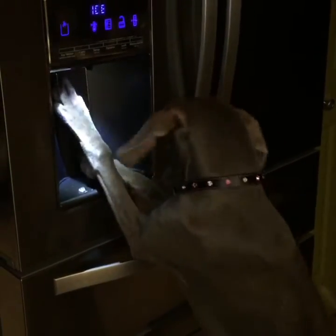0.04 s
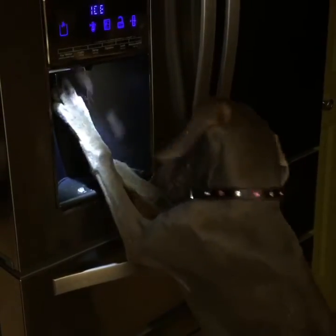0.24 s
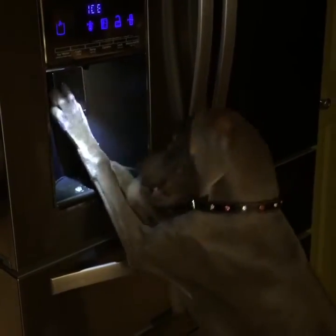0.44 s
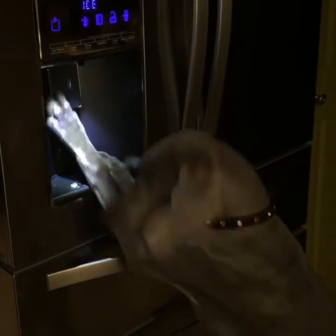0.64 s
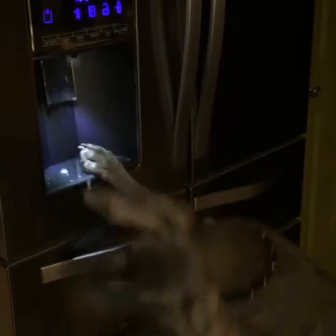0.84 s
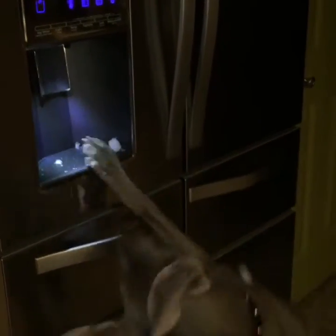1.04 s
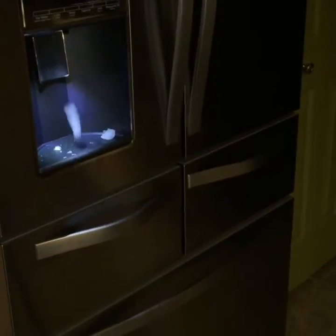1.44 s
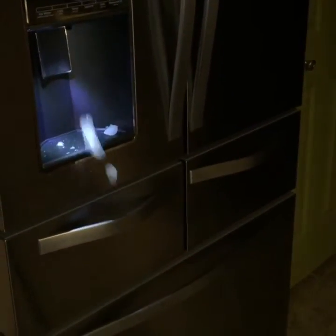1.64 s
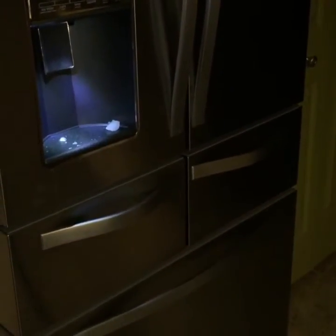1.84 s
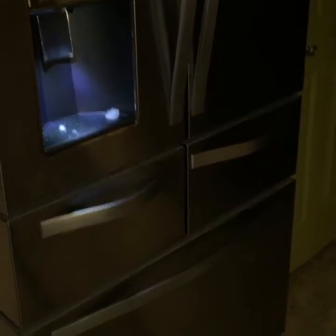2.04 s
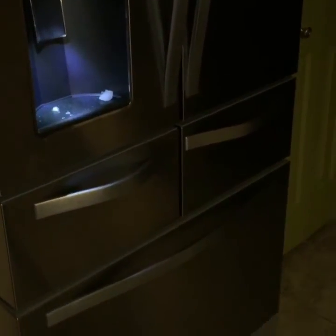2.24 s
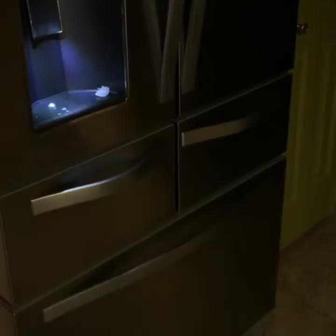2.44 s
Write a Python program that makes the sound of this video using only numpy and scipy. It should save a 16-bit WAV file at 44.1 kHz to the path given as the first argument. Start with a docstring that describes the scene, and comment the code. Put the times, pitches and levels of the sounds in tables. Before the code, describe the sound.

A refrigerator ice dispenser hums and whirs as ice clatters down its plastic chute, with dull bumps and faint dog tag jingles. The motor stops, and one piece clicks across the hard floor of a quiet kitchen.

```python
"""A dog leans on the paddle of a refrigerator's ice dispenser, and the auger motor hums and whirs.
The auger churns the ice, and falling pieces excite the resonances of the plastic chute and tray,
among bumps of the door and the first jingles of the dog's metal collar tags. Near 1.6 s the dog drops
away and the motor runs down. Last, one piece bounces with sharp clicks on the hard floor, while the
tags ring on and the dog moves off with a faint rubbing in the quiet, reverberant kitchen."""
import sys
import numpy as np
from scipy import signal
from scipy.fft import rfft, irfft, next_fast_len
from scipy.io import wavfile
from scipy.ndimage import map_coordinates

SR = 44100
rng = np.random.default_rng(int(sys.argv[2]) if len(sys.argv) > 2 else 0)


def output_pcm(signal):
    """Save a mono or channel-first signal as 16-bit PCM at the path in sys.argv[1].

    Samples are clipped to [-1, 1] before scaling.
    """
    pcm = np.clip(np.atleast_2d(signal).T, -1, 1) * 32767
    wavfile.write(sys.argv[1], SR, np.round(pcm).astype(np.int16))


N = 114660

# ice striking chute and tray (time [s], knock [dB], crack [dB], contact decay [s], ring of piece [Hz])
ICE_IMPACTS = [(.092, -41, -50.5, 0.0026, 3580), (0.202, -35.5, -51, 0.0085, 2150),
               (0.223, -29, -41, 0.013, 2080), (0.284, -28.5, -36, 0.0049, 2100),
               (.292, -26, -23.5, 0.0089, 2050), (0.349, -22.5, -21.5, 0.0093, 2080),
               (.394, -28, -17, 0.002, 3070), (0.4008, -55, -29, 0.0017, 3350),
               (0.4073, -49, -23.5, 0.0026, 3120), (.414, -30.5, -19, 0.016, 2670),
               (.498, -29, -36.5, 0.0069, 935), (0.547, -47, -35.5, 0.0056, 2980),
               (.625, -28, -36.5, 0.011, 1350), (0.7937, -23.5, -31, 0.0036, 1140),
               (0.7972, -20.5, -23.5, 0.0045, 1690), (0.877, -48, -39, 0.00038, 3000),
               (0.9242, -47, -29, 0.00074, 3000), (0.954, -24.5, -22.5, 0.0088, 2150),
               (1.009, -47, -25, 0.0073, 2170), (1.1244, -14, -22, 0.0023, 1900),
               (1.2565, -33.5, -38, 0.0042, 2670), (1.288, -24.5, -29.5, 0.0077, 1560),
               (1.3, -24.5, -31.5, 0.0022, 3240), (1.4221, -30, -19, 0.0055, 4100),
               (1.435, -33, -24.5, 0.0018, 4050), (1.4507, -51, -28, 0.0026, 4000),
               (1.5037, -25, -33.5, 0.0062, 2900), (1.54, -33, -36, 0.0022, 1250),
               (1.616, -17.5, -21.5, 0.0081, 1310), (1.638, -23, -24, 0.009, 3200),
               (1.646, -23.5, -22.5, 0.01, 2930)]
# modes of the plastic chute (frequency [Hz], gain [dB])
CHUTE_MODES = [(230, -2), (630, 4.5), (1130, 6.5), (1230, 5.5), (1440, 6.5), (1575, 2.5), (1890, 0.5),
               (2100, 6.5), (2400, 1.5), (2745, 2.5), (3250, 3), (3800, -0.5)]
# spectrum of cracking ice (frequency [Hz], gain [dB])
CRACK_SPECTRUM = [(100, -12), (800, -3), (2000, -4), (3300, 2.5), (4800, -1.5), (6200, 2.5), (9000, -2),
                  (12000, -5.5), (16000, -2.5)]
# envelope of the ice tumbling in the bin (time [s], level [dB])
CHURN_LEVEL = [(0, -51), (.17, -73), (.3, -44), (.45, -42.5), (.62, -35), (.77, -42.5), (.93, -34),
               (1.05, -36), (1.25, -41.5), (1.5, -37), (1.68, -36.5), (1.8, -46.5), (1.95, -66.5)]
# spectrum of the tumbling ice (frequency [Hz], gain [dB])
CHURN_SPECTRUM = [(200, -55.5), (700, -14.5), (1400, -6), (3000, -12), (4700, -15.5), (7000, -12.5),
                  (11000, -15.5), (16000, -13.5)]
# envelope of the auger motor (time [s], level [dB])
MOTOR_LEVEL = [(0, -33), (.2, -32), (.35, -30.5), (.55, -33.5), (.7, -31), (1.1, -32), (1.25, -35.5),
               (1.4, -38.5), (1.55, -41), (1.7, -61), (1.85, -76)]
# partials of motor and gears (frequency [Hz], level relative to the motor envelope [dB])
HUM_PARTIALS = [(183, -22), (365, -11.5), (640.6, -18)]
# spectrum of the gearbox whir (frequency [Hz], gain [dB])
WHIR_SPECTRUM = [(30, -38), (70, -31), (130, -16.5), (230, -1.5), (310, -3), (450, -5.5), (650, 1.5),
                 (1000, -3.5), (2000, -11.5), (3300, -15.5), (5000, -21), (10000, -38.5), (16000, -42)]
# ice landing on the floor (time [s], click level [dB], clack relative to the click [dB])
FLOOR_IMPACTS = [(1.814, -53, 1), (2.0862, -30, 2.5), (2.092, -23, -4.5), (2.1323, -30.5, -1.5),
                 (2.186, -40, -4), (2.325, -22, -12.5), (2.375, -38.5, -2.5), (2.482, -46.5, -22)]
# spectrum of a floor click, with a thin high sheen added near 15 kHz (frequency [Hz], gain [dB])
CLICK_SPECTRUM = [(100, -23), (600, -3), (2000, -22.5), (3500, 7), (6500, 8.5), (10000, 1), (13000, -3.5),
                  (15200, 4.5)]
# modes of the floor and the landing piece (frequency [Hz], bandwidth [Hz], gain [dB])
CLACK_MODES = [(950, 190, 5), (1680, 750, 5), (3150, 1860, 6)]
# dull bumps on the door (time [s], level [dB], frequency [Hz], contact decay [s])
DOOR_BUMPS = [(0.595, -28.5, 232, 0.03), (0.665, -43, 205, 0.0065), (0.693, -25.5, 263, .008),
              (.72, -27.5, 258, 0.026), (.791, -31.5, 275, 0.009), (.868, -22, 239, 0.014),
              (1.087, -40, 153, 0.01), (1.126, -24.5, 240, 0.0057), (1.32, -40, 81, 0.015),
              (1.558, -41, 139, 0.02), (2.087, -38, 218, 0.011), (2.325, -48, 293, 0.0062)]
# hollow knocks of paddle, tray and collar (time [s], level [dB], pitch [Hz])
HOLLOW_KNOCKS = [(.378, -29, 1420), (.587, -26.5, 850), (.874, -24, 710), (.909, -51, 792),
                 (1.3656, -34, 1400), (1.581, -23, 746), (1.885, -46, 1310), (2.046, -49.5, 740)]
# modes of those knocks (ratio to the pitch [1], bandwidth [Hz], gain [dB])
HOLLOW_MODES = [(1, 227, 3.5), (1.66, 200, -1), (2.1, 196, -5)]
# collar tags touching (time [s], lower mode's relative level [dB], upper mode's relative level [dB])
TAG_CONTACTS = [(0.546, -38, -36), (0.675, -43, -36.5), (0.983, -42, -29), (1.029, -34.5, -29.5),
                (1.368, -38, -32.5), (1.541, -34, -33), (1.651, -26.5, -28), (1.699, -36, -39),
                (1.828, -35.5, -53), (1.882, -33, -25.5), (2.044, -37.5, -30), (2.196, -52, -45),
                (2.262, -43.5, -47), (2.416, -46, -45), (2.437, -40.5, -43), (2.554, -40, -52),
                (2.574, -39.5, -40)]
# lower and upper mode of the tags (frequency [Hz])
TAG_MODES = [9730, 11085]
# envelope of the rubbing (time [s], level [dB])
RUB_LEVEL = [(2.05, -78.5), (2.25, -53.5), (2.42, -52), (2.6, -56.5)]
# spectrum of the still kitchen air (frequency [Hz], gain [dB])
AIR_SPECTRUM = [(25, -6), (110, -3.5), (200, -0.5), (450, -21), (1700, -15), (5000, -22), (15000, -44)]
# reverberation of the kitchen (frequency [Hz], time to fall by 60 dB [s])
ROOM_T60 = [(200, 0.97), (1400, 0.58), (4000, 0.5448), (8000, 0.41), (15000, 0.95)]
# spectrum of the reflections (frequency [Hz], gain [dB])
ROOM_SPECTRUM = [(200, 1), (1500, 0), (7000, -2.5), (11000, -6), (15000, -9)]


def clatter():
    """Impact excitation: each piece cracks brightly and drives its own mode and those of the chute."""
    out = np.zeros(N)
    chute_modes = [(hz, 0.071 * hz, db) for hz, db in CHUTE_MODES]
    for s, knock_db, crack_db, decay, hz in ICE_IMPACTS:
        piece = blow(damped_mode(flat_contact(decay), hz, relative_width=0.38))
        wall = blow(resonate(flat_contact(decay), chute_modes))
        knock = blow(wall + amp(1.5) * piece)
        crack = blow(coloured(contact(decay), CRACK_SPECTRUM))
        add(out, s, kitchen(amp(knock_db) * knock + amp(crack_db) * crack, room_db=-12.5))
    return out


def churn(contacts_per_s=400):
    """A Poisson process: many small, independent contacts of ice in the bin merge into a crunch."""
    impulses = (rng.random(N) < contacts_per_s / SR) * rng.choice([-1, 1], N)
    strength = amp(np.clip(rng.standard_normal(N), -2, 2))
    crunch = coloured(impulses * strength, CHURN_SPECTRUM)
    return level(CHURN_LEVEL) * unit(kitchen(crunch, room_db=2))


def motor(pitch_waver=0.0129, flutter_db=2.5, sag_db=-11, sag_s=0.24, sag_half_span_s=0.057):
    """Frequency and amplitude modulation roughen the motor's hum, over the noisy whir of the gears."""
    hum = 0
    for hz, db in HUM_PARTIALS:
        phase = 2 * np.pi * np.cumsum(hz * (1 + pitch_waver * wobble(22.66))) / SR
        roughness = 1 + .4 * wobble(70)
        hum += amp(db + flutter_db * wobble(12.52)) * roughness * np.sqrt(2) * np.sin(phase)
    # the hum weakens as the auger takes up the ice
    sag = amp(sag_db * np.exp(-((np.arange(N) / SR - sag_s) / sag_half_span_s) ** 4))
    whir = unit(coloured(rng.standard_normal(N), WHIR_SPECTRUM) * amp(1.7 * wobble(59.24)))
    return level(MOTOR_LEVEL) * (sag * hum + amp(-2.5) * whir)


def floor_bounces():
    """A brief impact has a broad spectrum: ice clicks on the floor; a flat landing adds a dull clack."""
    out = np.zeros(N)
    for s, db, clack_db in FLOOR_IMPACTS:
        chips = flat_contact(decay=0.00107)  # crumbs break off at each landing
        force = blow(signal.unit_impulse(len(chips))) + blow(chips)
        click = blow(coloured(force, CLICK_SPECTRUM))
        clack = blow(resonate(chips, CLACK_MODES))
        add(out, s, kitchen(amp(db) * (click + amp(clack_db) * clack), room_db=-6))
    return out


def bumps_and_knocks():
    """Damped resonance: the door panel thuds in one low mode; paddle, tray and collar knock in three."""
    out = np.zeros(N)
    for s, db, hz, decay in DOOR_BUMPS:
        thud = damped_mode(flat_contact(decay), hz, relative_width=0.33)
        add(out, s, amp(db) * blow(kitchen(thud, room_db=-9.5)))
    for s, db, hz in HOLLOW_KNOCKS:
        modes = [(hz * ratio, width, mode_db) for ratio, width, mode_db in HOLLOW_MODES]
        knock = resonate(flat_contact(decay=.012), modes)
        add(out, s, amp(db) * blow(kitchen(knock, room_db=-17.5)))
    return out


def collar_tags(t60_s=0.16, attack_s=0.0068, linewidth_hz=20, max_beat_hz=25.2):
    """Beating: two metal tags chatter together and ring at nearly the same pitch in two high modes."""
    out, t = np.zeros(N), np.arange(SR // 3) / SR
    envelope = amp(5.5 - 60 * t / t60_s) * (1 - np.exp(-t / attack_s))
    phase_step = np.sqrt(2 * np.pi * linewidth_hz / SR)  # a random walk of phase broadens each mode
    for s, *mode_dbs in TAG_CONTACTS:
        drifts = phase_step * np.cumsum(rng.standard_normal((2, len(t))), axis=1)
        ring = sum(amp(db) * np.sin(2 * np.pi * hz * t + drift)
                   for hz, db, drift in zip(TAG_MODES, mode_dbs, drifts))
        beat = np.cos(np.pi * max_beat_hz * rng.uniform(0.4, 1) * t)
        hiss = unit(resonate(rng.standard_normal(len(t)), [(11700, 10000, 0)]))
        rattle = amp(max(mode_dbs) - 18.5) * hiss
        add(out, s, kitchen((ring * beat + rattle) * envelope, room_db=-9.5))
    return out


def rubbing(hz=1620, width_hz=300):
    """Friction noise drives one resonance faintly as the dog moves off."""
    return level(RUB_LEVEL) * unit(resonate(rng.standard_normal(N), [(hz, width_hz, 0)]))


def still_air():
    """Stationary noise, strongest in the bass, forms the noise floor of the kitchen."""
    return amp(-62.5) * unit(coloured(rng.standard_normal(N), AIR_SPECTRUM))


def kitchen(x, room_db, early_db=-7.5, early_decay_s=0.024):
    """Convolution with a room response: direct sound, early reflections and a diffuse tail at room_db."""
    hz, frame_s, noise = signal.stft(rng.standard_normal(SR // 2), SR, nperseg=256)
    decay_db = along(ROOM_SPECTRUM, hz)[:, None] - 60 * frame_s / along(ROOM_T60, hz)[:, None]
    tail = signal.istft(noise * amp(decay_db), SR, nperseg=256)[1]
    t = np.arange(len(tail)) / SR
    tail *= 1 - np.exp(-t / 0.0013)
    spikes = rng.standard_normal(len(t)) ** 3  # cubing makes a few reflections stand out
    early = coloured(spikes * np.exp(-t / early_decay_s) * (1 - np.exp(-t / 0.0018)), ROOM_SPECTRUM)
    response = amp(room_db) * tail / np.linalg.norm(tail) + amp(early_db) * early / np.linalg.norm(early)
    response[0] += 1
    return signal.fftconvolve(x, response)[:N]


def contact(decay, grit_db=4.5):
    """The force of a rough contact: gritty noise that dies away exponentially."""
    t = np.arange(SR // 5) / SR
    return rng.standard_normal(len(t)) * amp(grit_db * rng.standard_normal(len(t))) * np.exp(-t / decay)


def flat_contact(decay):
    """Spectral whitening: a short contact force with nearly equal strength at all frequencies."""
    burst = contact(decay)
    t = np.arange(len(burst)) / SR
    window = np.exp(-(t / (5 * decay)) ** 2)
    for _ in range(3):
        phase = np.angle(rfft(burst))
        burst = irfft(np.exp(1j * phase), len(t)) * window
    return burst


def damped_mode(force, hz, relative_width):
    """Resonators in cascade: a second, broad one steepens the skirts of the first."""
    ring = resonate(force, [(hz, relative_width * hz, 0)])
    return resonate(ring, [(hz, hz, 0)])


def resonate(x, modes):
    """Modal superposition with alternating signs; modes are (frequency [Hz], bandwidth [Hz], gain [dB])."""
    def response(f):
        return sum((-1) ** k * amp(db) * 1j * f * width / (hz * hz - f * f + 1j * f * width)
                   for k, (hz, width, db) in enumerate(modes))
    return filtered(x, response)


def coloured(x, spectrum):
    """Minimum-phase filtering: a causal response shaped by (frequency [Hz], gain [dB]) points."""
    def response(hz):
        cepstrum = irfft(np.log(amp(along(spectrum, hz))))
        cepstrum[1:len(cepstrum) // 2] *= 2
        cepstrum[len(cepstrum) // 2 + 1:] = 0
        return np.exp(rfft(cepstrum))
    return filtered(x, response)


def filtered(x, response):
    """Linear filtering: the spectrum of x times a complex frequency response."""
    size = 2 * next_fast_len(len(x) // 2 + 4096)
    return irfft(rfft(x, size) * response(np.fft.rfftfreq(size, 1 / SR)), size)[:len(x)]


def amp(db):
    """Decibels as an amplitude ratio."""
    return 10 ** (np.asarray(db) / 20)


def unit(x):
    """Power normalisation to rms 1."""
    return x / np.sqrt(np.mean(x ** 2) + 1e-20)


def blow(x):
    """Energy normalisation to that of 10 ms at rms 1."""
    return x / np.linalg.norm(x) * np.sqrt(SR / 100)


def along(points, hz):
    """Interpolation of (frequency [Hz], value) points on a logarithmic frequency axis."""
    knot_hz, values = np.transpose(points)
    return np.interp(np.log(hz + 1), np.log(knot_hz + 1), values)


def level(points):
    """Amplitude envelope through (time [s], level [dB]) points."""
    return amp(np.interp(np.arange(N) / SR, *np.transpose(points)))


def wobble(knots_per_s):
    """Smooth random modulation: a spline through Gaussian values."""
    return map_coordinates(rng.standard_normal(256), [np.arange(N) * knots_per_s / SR], mode="wrap")


def add(out, s, x):
    """Superposition of x onto out, starting at s seconds."""
    start = max(0, round(s * SR))
    out[start:start + len(x)] += x[:len(out[start:])]


def scene():
    """The pressures of all sources add in front of the refrigerator."""
    low_cut = signal.butter(3, 190, "highpass", fs=SR, output="sos")  # small pieces radiate no bass
    ice = signal.sosfilt(low_cut, churn() + clatter() + floor_bounces())
    return (motor() + ice + bumps_and_knocks() + collar_tags() + still_air() + rubbing())[None]


def record(dry):
    """Saturation and band limiting: the microphone rounds the highest peaks and cuts the top treble."""
    ceiling, band_limit_hz = .75, 15600
    rounded = dry[0] / (1 + np.abs(dry[0] / ceiling) ** 4) ** (1 / 4)
    return filtered(rounded, lambda hz: 1 / (1 + (hz / band_limit_hz) ** 120))[None]


dry = scene()
out = record(dry)
output_pcm(out)
```